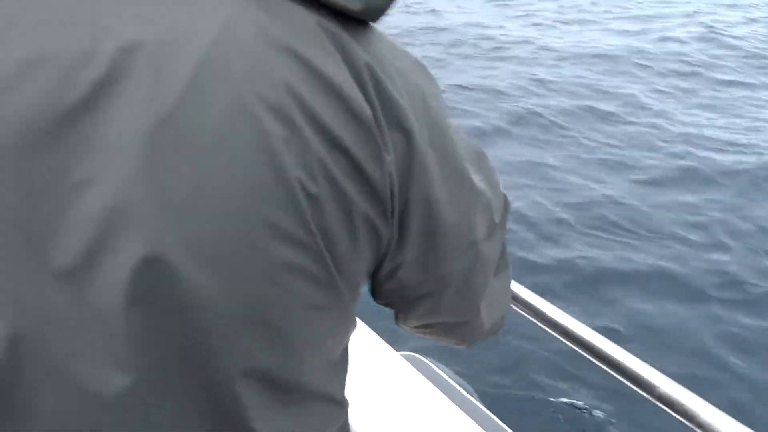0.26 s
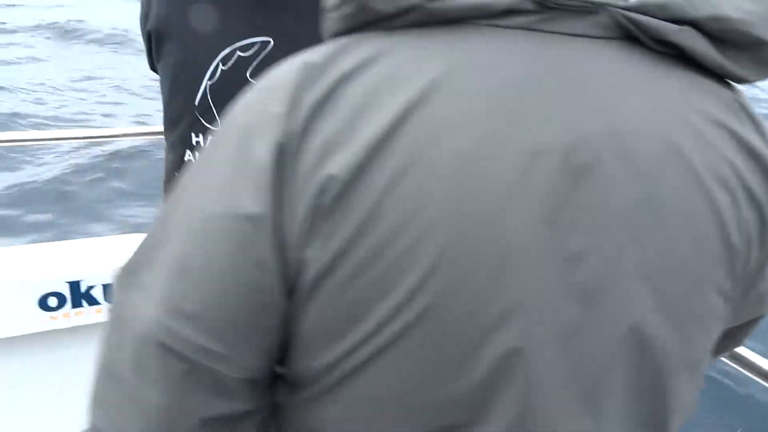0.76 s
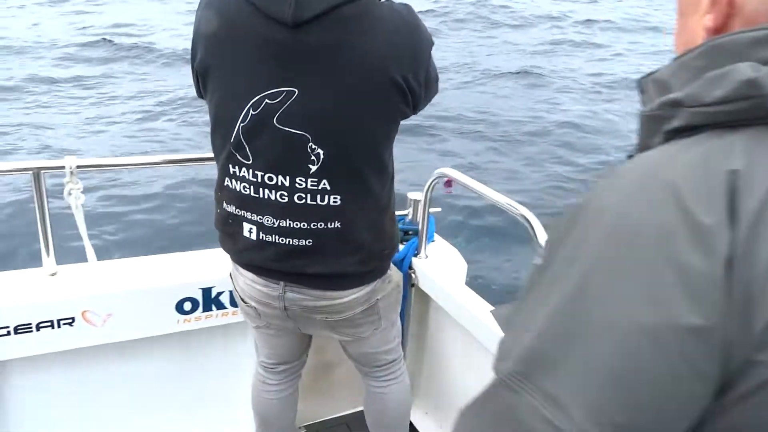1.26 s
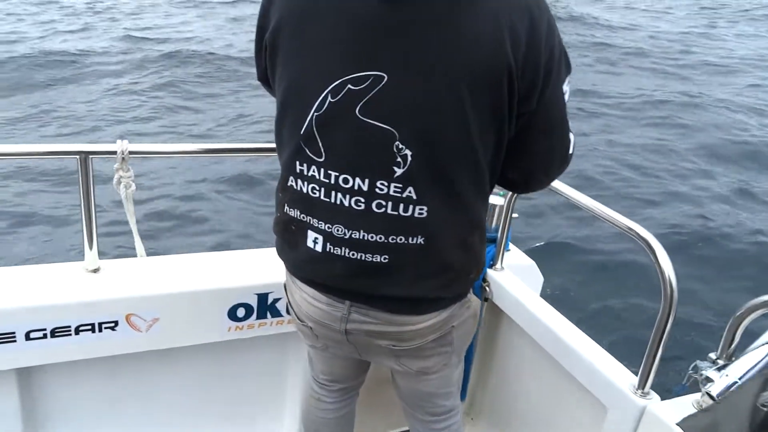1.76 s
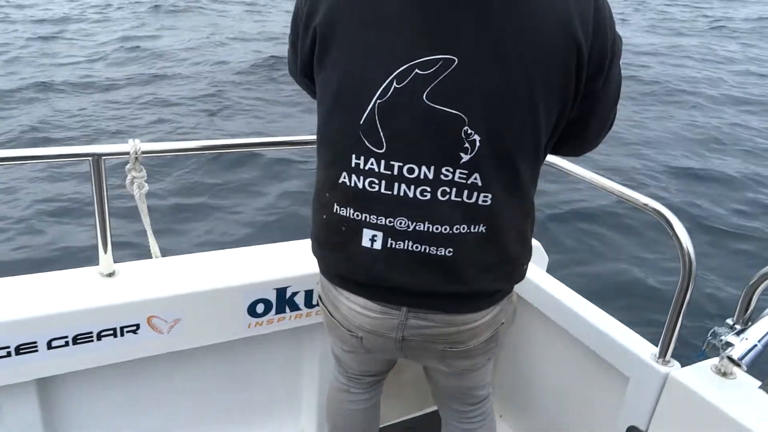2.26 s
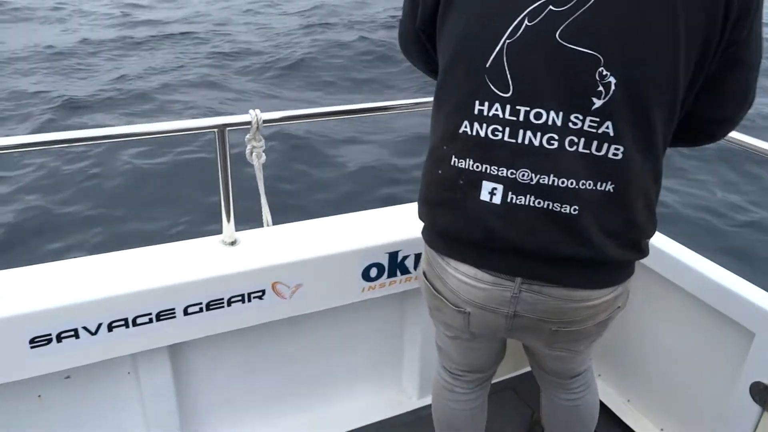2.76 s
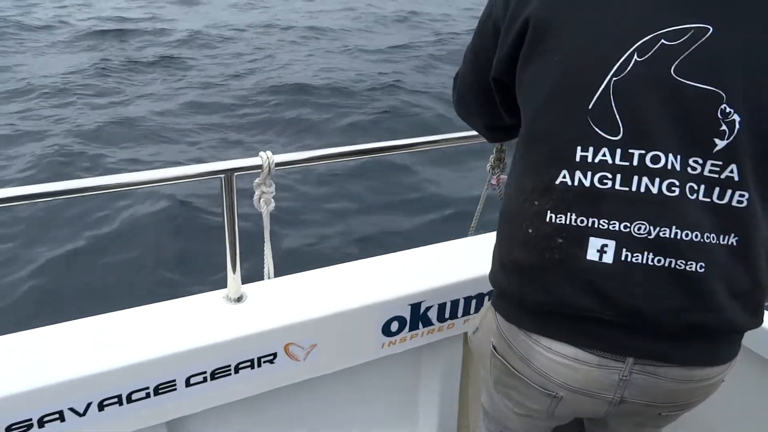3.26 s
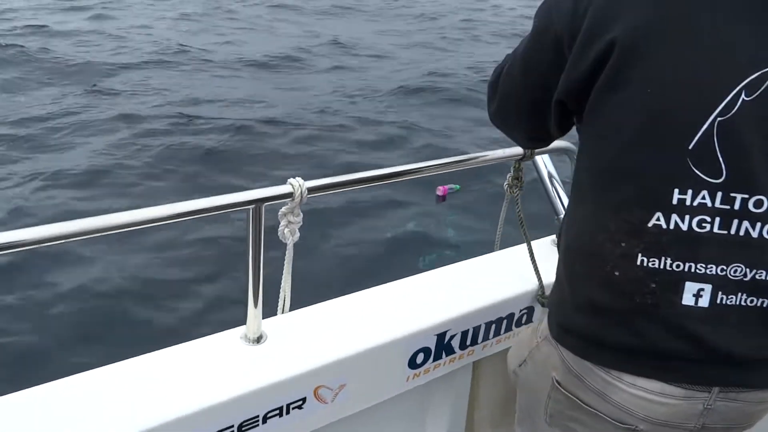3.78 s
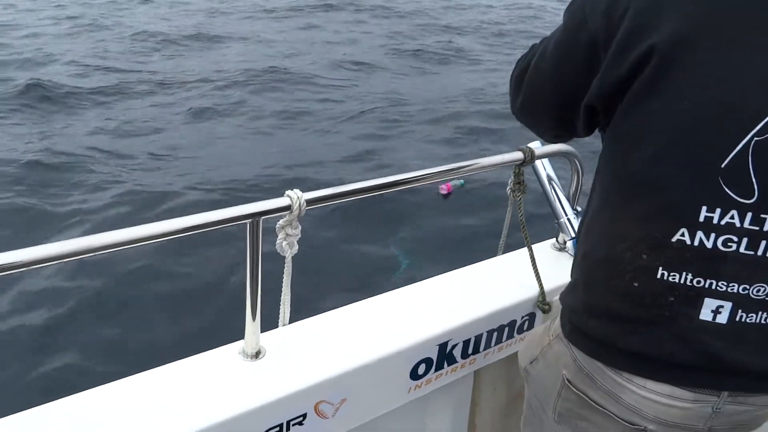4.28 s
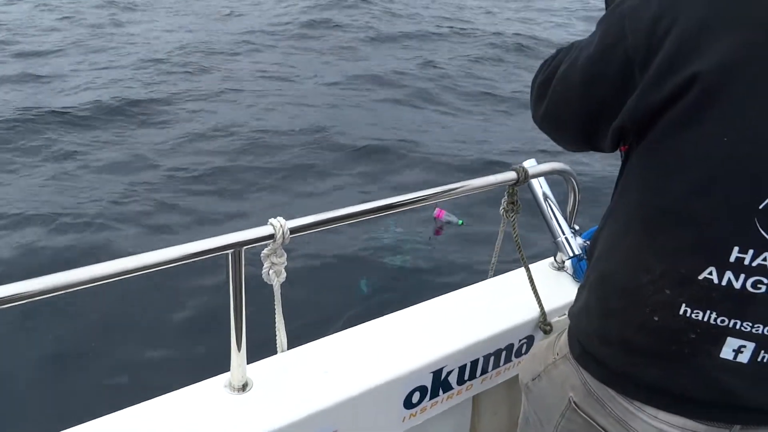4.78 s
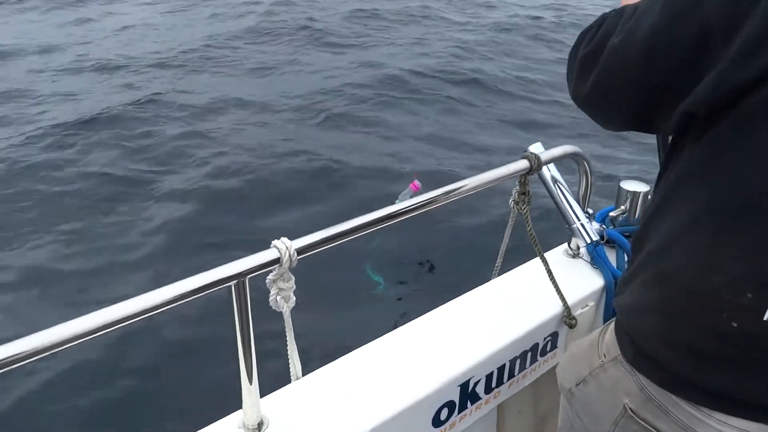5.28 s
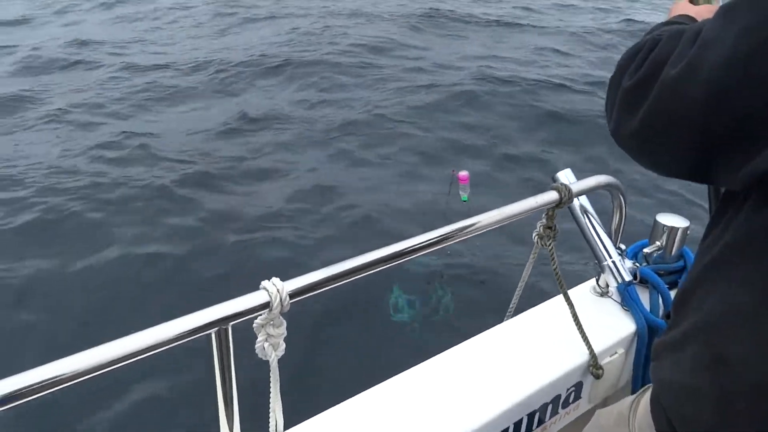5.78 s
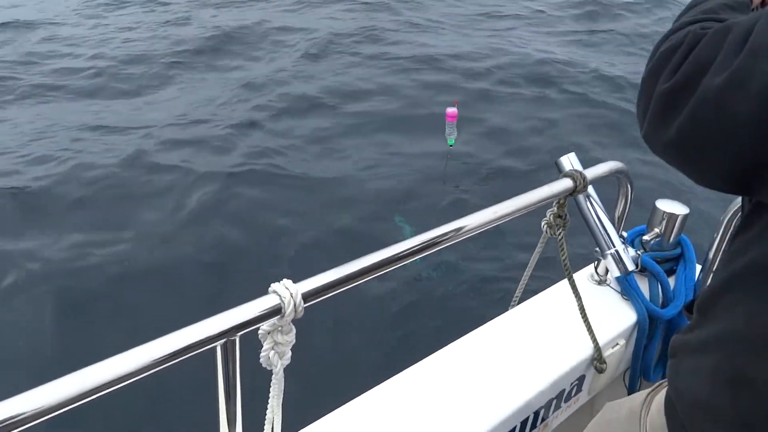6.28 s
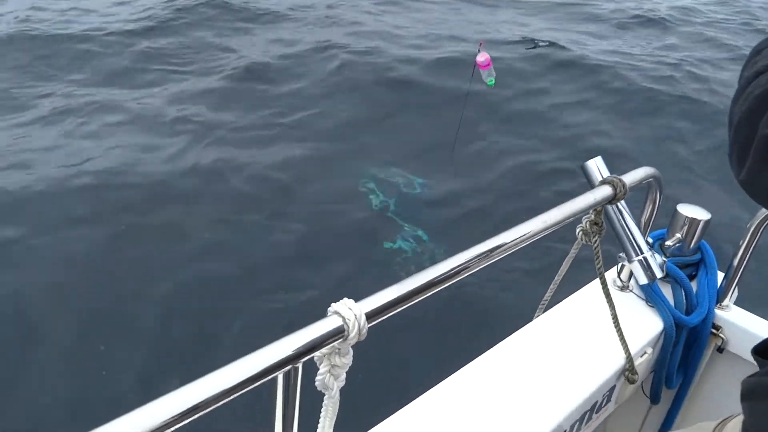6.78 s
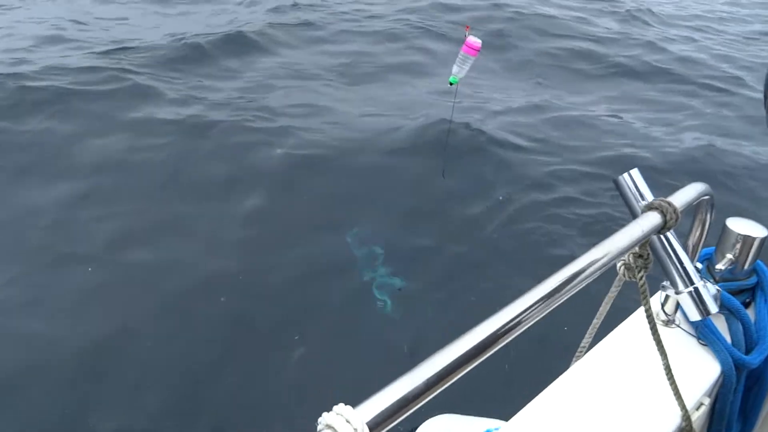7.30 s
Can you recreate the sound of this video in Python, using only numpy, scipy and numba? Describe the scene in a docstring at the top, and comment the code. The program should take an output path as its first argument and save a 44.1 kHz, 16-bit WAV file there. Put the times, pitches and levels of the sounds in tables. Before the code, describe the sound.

A fishing reel's clicker buzzes in three bursts as line is pulled off, over waves and light wind on a boat.

```python
"""A fishing reel's clicker buzzes in three bursts as line is pulled off, on a small boat at sea.
Each tooth is an impact that excites the reel's damped modes, heard directly and reflected off the
bulwark, while the line hisses in step with the spool. Waves wash and splash along the hull, tackle
knocks on deck, bubbles sound short gliding notes, and turbulent wind buffets the two microphone ports."""
import sys
import numpy as np
from scipy import signal
from scipy.fft import rfft, irfft
from scipy.io import wavfile
from scipy.ndimage import uniform_filter1d
from numba import njit

SR = 44100
rng = np.random.default_rng(int(sys.argv[2]) if len(sys.argv) > 2 else 0)


def unload_audio(sound):
    """Save the sound as a 16-bit wav file, at the path given as the first command line argument."""
    columns = np.transpose(np.atleast_2d(sound))
    # keep every value between -1 and 1, then stretch to whole-number steps
    steps = np.round(np.clip(columns, -1, 1) * 32767)
    wavfile.write(sys.argv[1], SR, steps.astype(np.int16))


N = 332514


def undb(db):
    """Amplitude ratio of a level in decibels."""
    return 10 ** (np.asarray(db) / 20)


def columns_at(rows, t):
    """Linear interpolation of a table's value columns at times t."""
    times, *columns = np.transpose(rows)
    return np.array([np.interp(t, times, column) for column in columns])


def colour(x, points):
    """Spectral shaping by (frequency [Hz], level [dB]) points, normalised to rms 1."""
    hz = np.maximum(np.arange(len(x) // 2 + 1) * SR / len(x), 1)
    point_hz, db = np.transpose(points)
    y = irfft(rfft(x) * undb(np.interp(np.log(hz), np.log(point_hz), db)), len(x))
    return y / np.std(y)


def wander(rate):
    """Random modulation: rate values a second, smoothed twice, with a spread near 1."""
    hold = int(SR / rate)
    steps = np.repeat(rng.standard_normal(N // hold + 1), hold)
    return 1.24 * uniform_filter1d(uniform_filter1d(steps, hold), hold)[:N]


def port_noise(correlation):
    """Partially coherent white noise at the left and right ports."""
    mid, side = rng.standard_normal((2, N))
    side = side * np.array([[1], [-1]])
    return (np.sqrt(1 + correlation) * mid + np.sqrt(1 - correlation) * side) / np.sqrt(2)


def band(x, hz, width_hz):
    """Second-order resonance as a band-pass."""
    return signal.lfilter(*signal.iirpeak(hz, hz / width_hz, fs=SR), x)


def highpass(hz):
    """Sections of a second-order high-pass."""
    return signal.butter(2, hz, "high", fs=SR, output="sos")


def flickering(spectrum, correlation, flicker_db, flicker_hz, grain_db):
    """Amplitude-modulated noise: each half-octave band has its own slow flicker and fast grain."""
    out, low_hz, high_hz = 0, spectrum[1][0], spectrum[-1][0]
    for hz in low_hz * 2 ** np.arange(0, np.log2(high_hz / low_hz), .5):
        gain = undb(flicker_db * wander(flicker_hz) + grain_db * wander(400))
        out = out + gain * band(port_noise(correlation), hz, hz / 2) / np.sqrt(hz)
    return np.array([colour(port, spectrum) for port in out])


@njit
def ring(at, strike, pole, ease, span):
    """Modal superposition: each blow feeds strike[port, blow, mode] in, ease of the rest per sample.
    The modes decay freely and are cut off span samples after the latest blow."""
    out = np.zeros((2, N))
    for mode in range(len(pole)):
        for port in range(2):
            push, motion = 0j, 0j
            for k in range(len(at)):
                push += strike[port, k, mode]
                end = at[k + 1] if k + 1 < len(at) else N
                for i in range(at[k], min(end, at[k] + span, N)):
                    motion = motion * pole[mode] + ease * push
                    push *= (1 - ease) * pole[mode]
                    out[port, i] += motion.imag
                if end > at[k] + span:
                    push, motion = 0j, 0j
    return out


def poles(hz, t60):
    """Poles of damped oscillators that fall 60 dB in t60 seconds."""
    return np.exp(2j * np.pi * hz / SR - np.log(1000) / (t60 * SR))


# Water wash and broadband hiss: (time [s], wash level [dB], hiss level [dB])
WASH_AND_HISS_LEVELS = [(0.0, -39.5, -37.5), (0.32, -35, -36.5), (0.55, -37.5, -34), (0.79, -44.5, -35.5),
                        (0.86, -38.5, -41), (1.0, -49, -45), (1.2, -48, -46), (1.4, -46, -44),
                        (2.03, -51, -46.5), (2.25, -47, -34), (2.41, -40, -49), (2.69, -47, -40),
                        (3.29, -49.5, -34), (3.45, -47, -43), (3.77, -54.5, -48.5), (3.92, -54, -50.5),
                        (4.1, -49.5, -45), (4.22, -54.5, -52), (4.35, -47, -51.5), (4.5, -53.5, -53.5),
                        (4.71, -56.5, -51.5), (5.3, -57, -56), (5.76, -50, -47.5), (6.0, -53, -48.5),
                        (6.35, -57, -55.5), (6.64, -44, -63), (7.02, -47, -69), (7.15, -62, -48.5),
                        (7.35, -52, -51.5), (7.54, -52, -47)]
# Spectra of the wash and of the hiss: (frequency [Hz], relative level [dB])
WASH_SPECTRUM = [(180, -47), (300, -11), (646, -1), (816, 2.5), (932, 0.5), (1860, -6.5), (2200, 0.5),
                 (2860, -7.5), (4840, -120)]
HISS_SPECTRUM = [(880, -3), (1500, -4.5), (2940, -1), (3870, -6.5), (5000, -4.5), (5950, -1.5),
                 (6700, -2.5), (7500, -0.5), (8300, -6.5), (9790, -8), (11500, -20), (13700, -22),
                 (15900, -28)]


def wash_and_hiss():
    """Modulated noise: gurgling water, and a hiss of spray plus, in the second pull, reel and line."""
    wash_db, hiss_db = columns_at(WASH_AND_HISS_LEVELS, np.arange(N) / SR)
    wash = flickering(WASH_SPECTRUM, correlation=0.84, flicker_db=3.5, flicker_hz=25, grain_db=3.0)
    hiss = flickering(HISS_SPECTRUM, correlation=0.95, flicker_db=3.0, flicker_hz=20, grain_db=2.5)
    treble_db = 0.6 * (hiss_db + 47)  # louder hiss is brighter
    hiss = hiss + (undb(treble_db) - 1) * signal.sosfiltfilt(highpass(10800), hiss)
    return undb([[-.5], [.5]]) * (undb(wash_db) * wash + undb(hiss_db) * hiss)


# Strength of the wind: (time [s], relative level [dB])
WIND_LEVELS = [(0.0, -49.5), (0.44, -50), (0.63, -60.5), (1.15, -53), (1.34, -48.5), (1.85, -60.5),
               (2.39, -52.5), (2.58, -61.5), (3.21, -55), (3.4, -62.5), (3.7, -67), (4.05, -54.5),
               (4.41, -66), (4.55, -55), (4.75, -68.5), (5.25, -64), (5.45, -62), (6.15, -64),
               (6.25, -50.5), (6.4, -58), (7.1, -54.5), (7.2, -71), (7.54, -66.5)]
# Spectrum of its rumble: (frequency [Hz], relative level [dB])
WIND_SPECTRUM = [(15, -57), (25, -29), (165, -0.5), (279, 4), (565, -7), (810, -5), (900, -14), (1170, -37),
                 (1980, -120)]
# Single buffets: (time [s], peak level [dB], centre frequency [Hz])
WIND_BUFFETS = [(0.049, -29, 292), (0.129, -28.5, 234), (0.215, -22.5, 414), (0.392, -21, 260),
                (0.456, -27, 385), (0.85, -26.5, 212), (0.946, -24, 288), (0.99, -27, 347),
                (1.156, -27.5, 242), (1.399, -28.5, 460), (1.485, -28, 480), (1.681, -35.5, 239),
                (1.768, -30, 497), (2.023, -26.5, 250), (2.204, -35.5, 226), (2.383, -34, 299),
                (2.419, -29.5, 290), (3.06, -31, 238), (3.325, -23.5, 174), (3.619, -38.5, 340),
                (3.851, -39.5, 304), (4.107, -38, 360), (4.341, -37, 380), (4.392, -29.5, 500),
                (4.57, -42, 210), (5.232, -46, 180), (5.299, -40, 378), (5.334, -31, 150),
                (5.357, -33.5, 312), (5.396, -30, 195), (5.593, -36.5, 198), (5.907, -33.5, 412),
                (6.198, -32, 169), (6.23, -35, 217), (6.269, -43, 259), (6.309, -39, 210),
                (6.462, -35, 248), (6.62, -30, 274), (6.775, -31, 338), (7.126, -37.5, 206)]


def wind(buffet_ms=42.8, random_count=30, random_hz=257, pan_spread_db=0.5):
    """Turbulent pressure at the ports: a wavering rumble with listed and random buffets."""
    wind_db, = columns_at(WIND_LEVELS, np.arange(N) / SR)
    rumble = flickering(WIND_SPECTRUM, correlation=0.57, flicker_db=5.5, flicker_hz=20, grain_db=3.5)
    out = undb(wind_db + 5.5) * rumble
    noise = signal.sosfilt(highpass(130), port_noise(0.29))
    when, pitch = rng.random((random_count, 2)).T
    at = (when * (N - SR // 5)).astype(int) + SR // 100
    random_buffets = np.transpose([at / SR, wind_db[at] + 14.5, random_hz * 2 ** (pitch - .5)])
    n = int(buffet_ms * SR / 1000)
    envelope = np.pad(np.sin(np.pi * np.sqrt(np.arange(n) / n)) ** 2, (0, n))
    for s, db, hz in np.concatenate([random_buffets, WIND_BUFFETS]):
        i = int((s - .003) * SR)
        pan_db = pan_spread_db * rng.standard_normal()
        puff = band(band(noise[:, i:i + 2 * n] * envelope, hz, 1.3 * hz), hz, 1.3 * hz)
        out[:, i:i + 2 * n] += puff / np.abs(puff).max() * undb(db + np.array([[-pan_db], [pan_db]]) / 2)
    return out


# Splashes: (time [s], body level [dB], body frequency [Hz], spray re body [dB], 30 dB decay time [ms])
HULL_SPLASHES = [(0.028, -27.5, 2550, 5, 69), (0.182, -50.5, 3000, 20.5, 23), (0.499, -31, 2090, -2, 64),
                 (1.187, -39.5, 2470, 5.5, 205), (1.314, -40, 2320, 3, 137), (1.35, -43.5, 2360, 9.5, 45),
                 (1.492, -36, 1500, -12, 51), (2.382, -37, 1500, 7, 85), (2.437, -36.5, 1830, 7, 76),
                 (3.851, -41, 810, -25, 22), (3.928, -44, 2760, 1, 125), (4.01, -57, 894, 1, 280),
                 (4.08, -48, 830, -8, 190), (3.95, -54, 2600, -10, 74), (4.153, -41, 695, -12, 35),
                 (4.309, -44, 2490, -12, 27), (4.368, -55, 3000, 18, 8.1), (4.367, -42.5, 840, -22, 210),
                 (4.565, -46, 2760, 4, 48), (4.57, -46.5, 2760, 7.5, 39), (4.63, -46.5, 1960, -2, 74),
                 (4.668, -36, 950, -7, 48), (4.691, -39, 2180, -25, 31), (4.7, -49, 800, -26, 54),
                 (4.715, -57.5, 6960, 11, 120), (4.969, -45.5, 1610, -11, 34), (5.275, -47, 2000, -8, 28),
                 (5.576, -45.5, 1840, -2, 110)]


def splashes(rise_share=0.071):
    """Water impact on the hull: a hollow resonance and spray, both grainy, decay exponentially."""
    out, droplets = np.zeros((2, N)), undb(0.64 * wander(700))
    slap = port_noise(0.95) * droplets
    spray = np.array([colour(port, HISS_SPECTRUM) for port in port_noise(0.95) * droplets])
    ms = np.arange(SR // 4) * 1000 / SR
    for s, db, hz, spray_db, decay_ms in HULL_SPLASHES:
        span = slice(int(s * SR), int(s * SR) + len(ms))
        rise_ms = rise_share * decay_ms
        envelope = np.minimum(ms / rise_ms, 1) * undb(-30 * np.maximum(ms - rise_ms, 0) / decay_ms)
        body = band(band(slap[:, span], hz, 0.82 * hz), hz, 0.82 * hz)
        out[:, span] += undb(db) * envelope * (body / np.std(body) + undb(spray_db) * spray[:, span])
    return out


# Tackle bouncing on deck: (time [s], relative level [dB], lift above 4 kHz [dB])
TACKLE_BLOWS = [(0.029, -13, 2), (.032, -4, 3), (0.033, -14, 4.5), (0.035, -14, -5), (0.038, -19, -1),
                (0.04, -6, -2), (0.393, -13, -3), (.909, -18.5, -15), (1.191, -24, -10), (1.198, -18, -17),
                (1.202, -13.5, -16), (1.211, -19, -12), (1.218, -17, -6), (1.322, -27, -12),
                (1.327, -18, -10), (1.362, -18, -12), (1.365, -17, -8), (2.439, -14, -3), (2.445, -12, -3),
                (4.669, -27, -1)]
# Its modes: (frequency [Hz], relative level [dB], 60 dB decay time [s])
TACKLE_MODES = [(1810, -4, 0.014), (2686, -2, 0.022), (3190, -9.5, 0.038), (3300, -31, 0.024),
                (4650, -4, 0.011), (6650, -12, 0.014), (7840, -7, 0.013)]


def tackle_knocks():
    """Free vibration after impact: every bounce rings the same modes with random phases."""
    s, db, treble_db = np.transpose(TACKLE_BLOWS)
    hz, mode_db, t60 = np.transpose(TACKLE_MODES)
    gain = undb(db[:, None] + mode_db + treble_db[:, None] * (hz > 4000) - 8)
    strike = gain * np.exp(2j * np.pi * rng.random(gain.shape))
    port_phase = np.exp(0.3j * rng.standard_normal((2, 1, len(hz))))
    return ring((s * SR).astype(np.int64), strike * port_phase, poles(hz, t60), ease=0.39, span=SR // 20)


# Spool speed, one table per pull: (time [s], tooth rate [1/s])
SPOOL_PULLS = [
    [(1.7162, 33.9), (1.782, 58.8), (1.889, 15.4)],
    [(2.0396, 18.7), (2.133, 45.1), (2.241, 66.3), (2.274, 56.1), (2.384, 52.2), (2.405, 48.8),
     (2.429, 32.9), (2.543, 89.0), (2.566, 91.1), (2.589, 79.6), (2.685, 65.6), (2.714, 76.1),
     (2.743, 58.8), (2.881, 72.7), (2.994, 86.2), (3.026, 96.2), (3.069, 92.1), (3.122, 59.6),
     (3.152, 72.2), (3.176, 92.1), (3.216, 109.7), (3.305, 91.5), (3.392, 1.6)],
    [(6.3758, 28.3), (6.493, 74.0), (6.556, 84.7), (6.605, 79.4), (6.701, 86.4), (6.723, 99.1),
     (6.782, 101.3), (6.865, 91.9), (6.941, 67.5), (6.972, 58.1), (7.086, 83.6), (7.123, 76.9),
     (7.217, 71.4), (7.248, 61.0), (7.287, 40.5), (7.329, 56.5), (7.389, 75.3), (7.442, 76.6),
     (7.521, 50.8)],
]


def tooth_times():
    """Ratchet action: the pawl drops each time the integral of the tooth rate gains one."""
    times = []
    for pull in SPOOL_PULLS:
        t = np.arange(pull[0][0], pull[-1][0], 1 / SR)
        passed = np.cumsum(columns_at(pull, t)[0]) / SR
        times.append(np.interp(np.arange(round(passed[-1]) + 1), passed, t))
    return np.concatenate(times)


# Envelope of the reel's many weak modes, then its strong modes: (frequency [Hz], relative level [dB])
WEAK_MODE_ENVELOPE = [(740, -54), (1250, -33), (1350, -6), (1710, -55), (1990, -74), (2180, -18),
                      (2400, -7.5), (3160, -1.5), (3580, -5.5), (4920, -4), (6890, 1.5), (11800, -16.5),
                      (15500, -27)]
STRONG_MODES = [(2230, -4.5), (2400, 1), (2680, -1.5), (3200, -1.5), (4590, -19), (5560, -6), (8400, -14)]


def reel_modes(weak_count=110, weak_t60=0.014, strong_t60=0.023):
    """Normal modes of the reel: frequencies, amplitudes of unit norm and decay times."""
    envelope_hz, envelope_db = np.transpose(WEAK_MODE_ENVELOPE)
    strong_hz, strong_db = np.transpose(STRONG_MODES)
    weak_hz = np.linspace(envelope_hz[1], envelope_hz[-1], weak_count)
    weak_hz += 30 * rng.standard_normal(weak_count)
    weak_db = np.interp(np.log(weak_hz), np.log(envelope_hz), envelope_db)
    size = undb(np.concatenate([weak_db, strong_db]))
    t60 = np.repeat([weak_t60, strong_t60], [weak_count, len(strong_hz)])
    return np.concatenate([weak_hz, strong_hz]), size / np.linalg.norm(size), t60


def bell(hz, centre_hz, width_hz):
    """Bell-shaped spectral peak of height 1."""
    return np.exp(-((hz - centre_hz) / width_hz) ** 2)


# Two bright bands as the reel turns with the rod, one table per pull: (time [s], lower centre [Hz],
# upper centre [Hz], lower lift [dB], upper lift [dB], close reflection strength [0-1])
BRIGHT_BANDS = [
    [(1.71, 4080, 6460, -3, 6, 0.3), (1.9, 4340, 6590, 6, 2, 0)],
    [(2.04, 4220, 6540, 7, 4.5, 0.03), (2.2, 3800, 6420, 5, 4, 0.17), (2.4, 3720, 6500, 8.5, 6.5, 0.1),
     (2.52, 4000, 6500, 10, 2, 0.06), (2.58, 3880, 6150, 8, 5, 0.2), (2.7, 3840, 6860, 11.5, 5.5, 0.1),
     (2.8, 4030, 7000, 7, 3, 0), (2.9, 4100, 6670, 6, 5, 0.2), (2.96, 4300, 6630, 8, -6, 0),
     (3.04, 4460, 7000, 5, 8, 0.4), (3.13, 4150, 6450, 10, 3, 0), (3.22, 4170, 7000, 2, 8, 0.6),
     (3.28, 3900, 6200, 3, 2, 0.3), (3.4, 3650, 6800, 10, 3, 0.5)],
    [(6.37, 4130, 6650, -3, 1.5, 0.2), (6.56, 4420, 6550, 0, -1, 0), (6.66, 4600, 6270, 14, -1, 0.2),
     (6.75, 4230, 7000, 2, 8, 0.1), (6.81, 3750, 6300, 11, 0, 0), (6.88, 4030, 7000, 5.5, 3, 0.25),
     (6.97, 4560, 6060, 10, 4, 0.36), (7.02, 4460, 6300, 11, 5.5, 0.1), (7.1, 4310, 7170, 7, 13.5, 0.7),
     (7.15, 4360, 6450, 11, 13, 0.3), (7.17, 4370, 7350, 7, 19, 0), (7.3, 3770, 6870, 11, 7.5, 0.1),
     (7.4, 4100, 7260, 3, 13, 0.14), (7.54, 3760, 6800, 14, -1, 0.4)],
]
# Three narrow bands as it turns: (time [s], lift at 2750 Hz [dB], at 3190 Hz [dB], at 6160 Hz [dB])
NARROW_BANDS = [(1.71, 4, 1, 8), (1.9, 5, -3, 0), (2.04, 0, -10, 8), (2.4, -3, -2.5, -3),
                (2.55, -14, -11, -8), (2.7, -2, -8, 9), (2.85, 2.5, 2, 3), (3.0, 3, -9, 7),
                (3.1, 1, -2, -2), (3.22, -1, -1, 1), (3.4, -1, 5, -5), (6.37, -7, 9, -1),
                (6.55, -0.5, 1.5, -13), (6.7, 6.5, 5, 4), (6.85, -4, -2.5, 9), (7.0, 6, 3.5, 5),
                (7.15, 1, 1, 6), (7.25, 10, 9, 3), (7.4, 1, 1.5, 6), (7.54, 1, 6.5, -5)]


def reel_radiation(t, hz):
    """Directivity and comb interference: the gain per tooth and mode, and the upper band's shape."""
    bright = columns_at(np.concatenate(BRIGHT_BANDS), t)[:, :, None]
    lower_hz, upper_hz, lower_db, upper_db, reflection = bright
    upper_band = bell(hz, upper_hz, 215)
    lift_db = lower_db * bell(hz, lower_hz, 150) + upper_db * upper_band
    for db, centre_hz, width_hz in zip(columns_at(NARROW_BANDS, t), (2750, 3190, 6160), (74, 65, 98)):
        lift_db += db[:, None] * bell(hz, centre_hz, width_hz)
    # hand and rod form a small moving reflector that returns little of the low modes
    reflection = reflection + 0.026 * wander(3.66)[(t * SR).astype(int), None]
    reflection = reflection * np.clip(hz / 950 - 1, 0, 1)
    delay_s = 5 / upper_hz  # the fifth comb peak lies on the upper band
    comb = np.abs(1 + reflection * np.exp(-2j * np.pi * hz * delay_s)) / np.sqrt(1 + reflection ** 2)
    return undb(lift_db) * comb, upper_band


def tooth_excitation(teeth, modes, colour_db=0.8, force_db=0.95, swell_db=0.8):
    """Uneven impacts: teeth differ in colour and force; groups of modes swell over some ten teeth."""
    tint = uniform_filter1d(rng.standard_normal((teeth, modes)), size=7, axis=1)
    force = rng.standard_normal((teeth, 1))
    swell = uniform_filter1d(rng.standard_normal((teeth, modes)), size=11, axis=0)
    swell = uniform_filter1d(swell, size=3, axis=1)
    return undb(colour_db * tint / tint.std() + force_db * force + swell_db * swell / swell.std() - 1.12)


# The reel at the ports, one table per pull: (time [s], direct level [dB], echo level [dB],
# lift below 2550 Hz [dB], left minus right [dB])
ARRIVAL_LEVELS = [
    [(1.71, -21.5, -21.5, 4, -0.5), (1.9, -21.5, -17.5, -1, 1)],
    [(2.04, -33, -19.5, 1.5, 0.5), (2.2, -20, -18, -5, 0), (2.5, -16.5, -17.5, -3, -0.5),
     (2.65, -21, -16.5, -4, 0), (2.8, -22.5, -17, -2.5, 0), (2.95, -22, -15.5, -2.5, -0.5),
     (3.1, -18, -16.5, -6, 0), (3.23, -18, -18, -4.5, -0.5), (3.33, -18.5, -16.5, -4.5, 0),
     (3.4, -18.5, -17.5, 2, 1)],
    [(6.37, -15.5, -27.5, -0.5, -1), (6.55, -12.5, -25.5, 0, -1), (6.75, -14, -25.5, -3, -.9),
     (6.95, -13.5, -24, -1.5, -2), (7.1, -18.5, -22.5, 1, -2), (7.25, -19, -22.5, 0.5, -2),
     (7.4, -16.5, -23, 3.5, -2), (7.54, -15.5, -26, 0, -2)],
]
# Bulwark echo as the angler moves: (time [s], delay [ms], echo's upper band lift [dB],
# lift of later echoes [dB], lift near 8370 Hz on all paths [dB])
BULWARK_ECHO = [(1.71, 4.6, 10.5, -6, -2), (1.9, 5.3, 8.5, -5, 6), (2.04, 5.3, 7.5, -7, 4),
                (2.351, 4.8, -1, 0, 5), (2.551, 4.75, 0, 1.5, 4), (2.7, 4.7, -1, -0.5, 9.5),
                (2.779, 4.2, -1, 1, 8), (2.869, 4.2, 1, 0.5, 9.5), (3.0, 4.5, -7, 3, 5),
                (3.201, 4.2, -3, 1, 3), (3.399, 4.6, -1, -1.5, 4), (6.37, 5.7, 5, 3, 4),
                (6.6, 5.86, -5, 7.5, 5), (6.9, 5.73, 0, 4.5, -17), (7.2, 5.5, -7.5, -10, -1.5),
                (7.54, 5.3, 2, 0, -12)]
# Paths to the ports: (time offset [ms], relative level [dB], share of the echo delay [0-1, 0 = direct])
REEL_PATHS = [(-0.3, -0.5, 0), (0.07, -4.5, 0.067), (2.5, -5, 0), (-0.5, -0.5, 0.93), (0.7, -4, 0.96),
              (3, -4.5, 0.94), (6.5, -13.5, 0.91), (9, -10, 1), (14.5, -26, 1), (13.5, -15, 0.82),
              (13, -14, 0.88), (19.5, -12, 0.95)]


def reel_clicker(drift_rad=0.31, first_scatter_rad=1.9):
    """Multipath propagation: each tooth rings the same modes, their phases drifting as the rod moves."""
    hz, size, t60 = reel_modes()
    t = tooth_times()
    radiation, upper_band = reel_radiation(t, hz)
    size = size * radiation * tooth_excitation(len(t), len(hz))
    direct_db, echo_db, low_db, pan_db = columns_at(np.concatenate(ARRIVAL_LEVELS), t)[:, :, None]
    echo_ms, echo_upper_db, later_db, top_db = columns_at(BULWARK_ECHO, t)[:, :, None]
    size = size * undb(low_db * (hz < 2550) + top_db * bell(hz, 8370, 300))
    pan = undb(np.array([pan_db, -pan_db]) / 2)
    side = 0.08 * (1 + (hz / 11300) ** 3) * np.array([1, -1])[:, None, None]  # treble is less coherent
    arrivals, strikes = [], []
    for ms, db, echo_share in REEL_PATHS:
        start = rng.uniform(0, 2 * np.pi, (2, 1, len(hz)))
        drift = np.cumsum(drift_rad * rng.standard_normal((2, len(t), len(hz))), axis=1)
        mid_phase, side_phase = start + drift
        if ms < 0:  # first arrivals start more in step, a crisp tick
            mid_phase = first_scatter_rad * np.sin(mid_phase)
        else:  # later ones carry less of the low modes
            db = db - 4 * (hz < 3400)
        path_db = echo_db + later_db * (ms > 2) if echo_share else direct_db
        gain = size * undb(db + path_db + echo_share * echo_upper_db * upper_band)
        strikes.append(gain * pan * (np.exp(1j * mid_phase) + side * np.exp(1j * side_phase)))
        arrivals.append(t + (ms + echo_share * echo_ms[:, 0]) / 1000)
    arrivals, strikes = np.concatenate(arrivals), np.concatenate(strikes, axis=1)
    order = np.argsort(arrivals)
    at = (arrivals[order] * SR).astype(np.int64)
    clicks = ring(at, strikes[:, order], poles(hz, t60), ease=0.037, span=SR // 20)
    return 2 * signal.sosfilt(highpass(1100), clicks)  # a small body radiates little bass


# Spectrum of the running line: (frequency [Hz], relative level [dB])
LINE_SPECTRUM = [(300, -18), (1200, -13), (3000, 6.5), (7000, 0.5), (9800, -0.5), (13700, -46),
                 (15900, -48)]


def line_hiss(pull_db=(-35, -38.5, -39.5), reference_teeth_per_s=80):
    """Noise of line leaving the spool, with amplitude proportional to its speed."""
    gain = 0
    for db, pull in zip(pull_db, SPOOL_PULLS):
        tooth_rate = np.interp(np.arange(N) / SR, *np.transpose(pull), left=0, right=0)
        gain = gain + undb(db) * tooth_rate / reference_teeth_per_s
    return gain * np.array([colour(port, LINE_SPECTRUM) for port in port_noise(1.0)])


# Two bubbles and a thin whistle: (time [s], length [ms], start pitch [Hz], end pitch [Hz], level [dB])
BUBBLE_NOTES = [(3.43, 58, 595, 1100, -46), (3.985, 34, 820, 646, -50), (6.0, 173, 2060, 2030, -54)]


def bubbles_and_whistle():
    """Bubble resonance glides and wavers near the surface; the whistle is a longer, steadier note."""
    out, wobble, waver_db = np.zeros(N), wander(300), 2.2 * wander(500)
    for s, ms, start_hz, end_hz, db in BUBBLE_NOTES:
        progress = np.linspace(0, 1, int(ms * SR / 1000))
        span = slice(int(s * SR), int(s * SR) + len(progress))
        hz = (start_hz + (end_hz - start_hz) * progress ** 2) * (1 + 0.015 * wobble[span])
        envelope = np.sqrt(2 * np.sin(np.pi * progress))
        out[span] += undb(db) * envelope * np.sin(2 * np.pi * np.cumsum(hz) / SR)
    return out * undb(waver_db)


def scene():
    """Superposition of all sources at the two ports."""
    fishing_gear = reel_clicker() + line_hiss() + tackle_knocks()
    return fishing_gear + wash_and_hiss() + wind() + splashes() + bubbles_and_whistle()


# Response to the difference between the ports: (frequency [Hz], gain [dB])
SIDE_RESPONSE = [(40, -4), (120, -6.5), (300, -1), (600, 1.5), (1500, 1), (3500, 2.5), (6800, -4),
                 (10000, 7.5), (14000, 1)]


def record(dry):
    """Band-limited microphone: deep bass and top treble are lost; the ports agree more in the bass."""
    mid, side = (dry[0] + dry[1]) / 2, (dry[0] - dry[1]) / 2
    hz, lift_db = np.transpose(SIDE_RESPONSE)
    bin_hz = np.arange(N // 2 + 1) * SR / N + 1
    side = irfft(rfft(side) * undb(np.interp(np.log(bin_hz), np.log(hz), lift_db)), N)
    x = signal.sosfilt(highpass(65), [mid + side, mid - side])
    x = signal.sosfilt(signal.butter(2, 12500, fs=SR, output="sos"), x)
    return signal.sosfilt(signal.ellip(10, .2, 70, 15850, fs=SR, output="sos"), x)


dry = scene()
out = record(dry)
unload_audio(out)
```